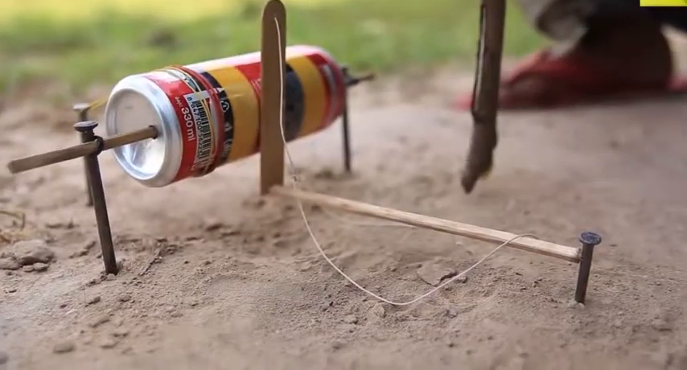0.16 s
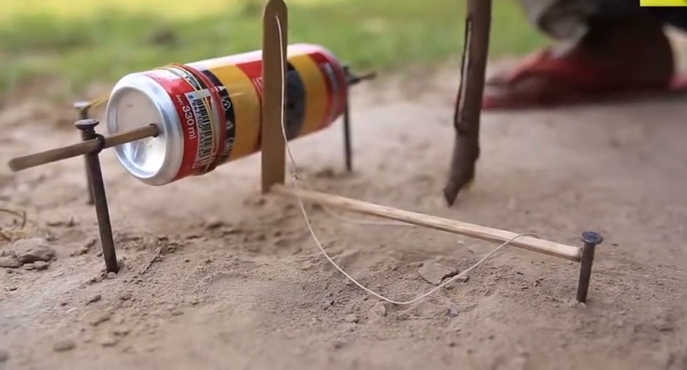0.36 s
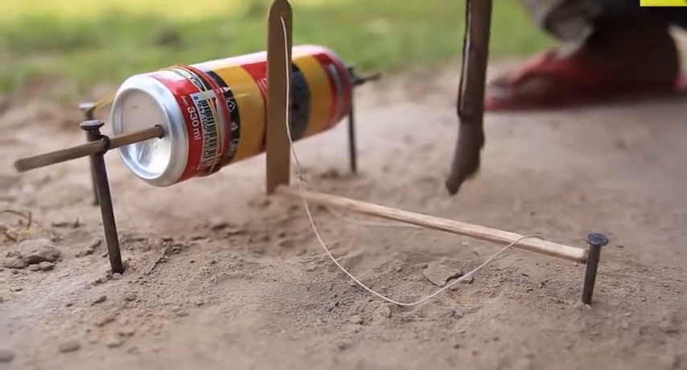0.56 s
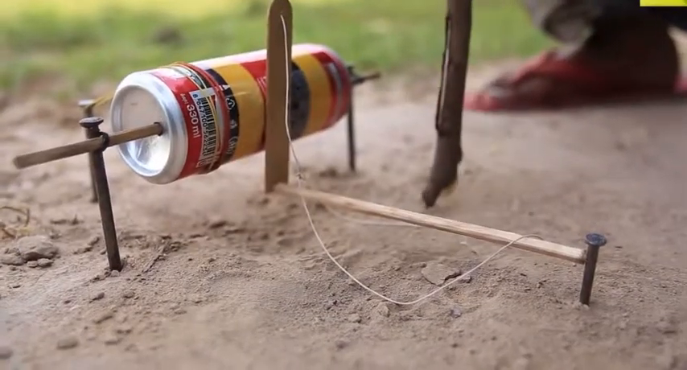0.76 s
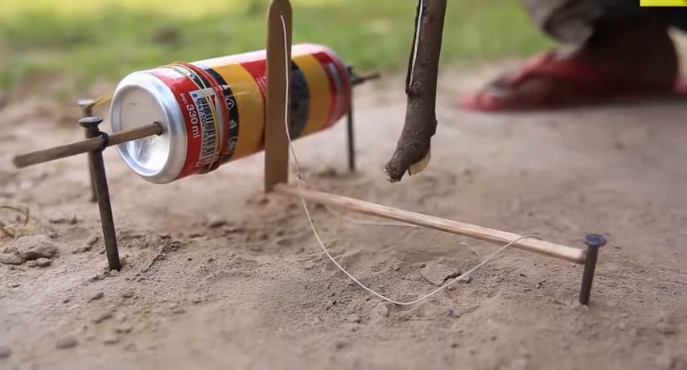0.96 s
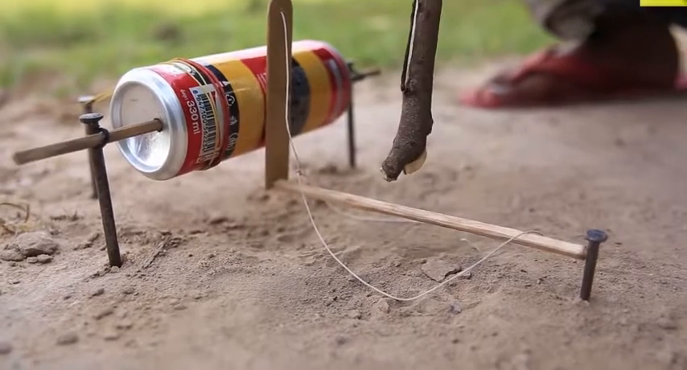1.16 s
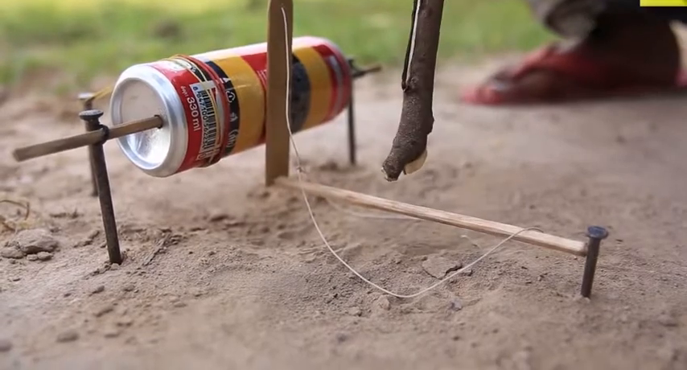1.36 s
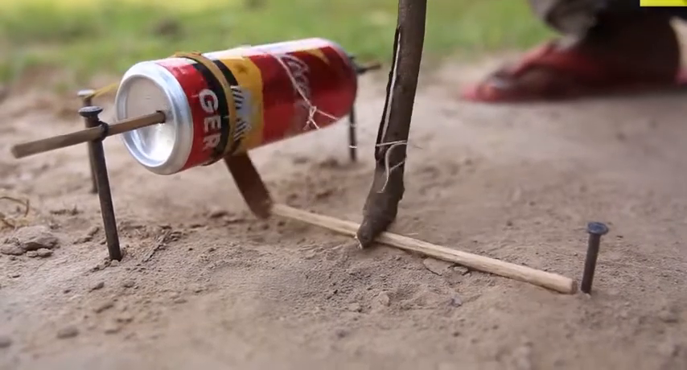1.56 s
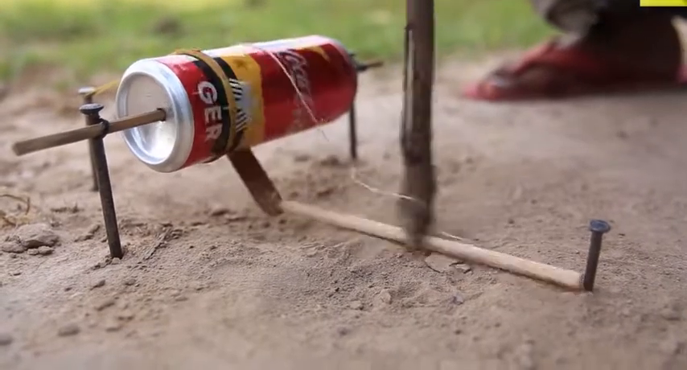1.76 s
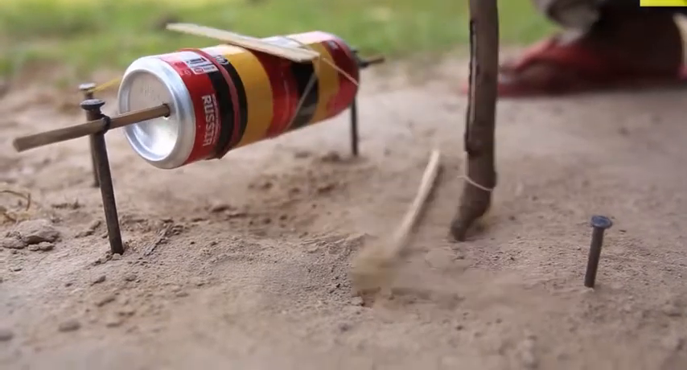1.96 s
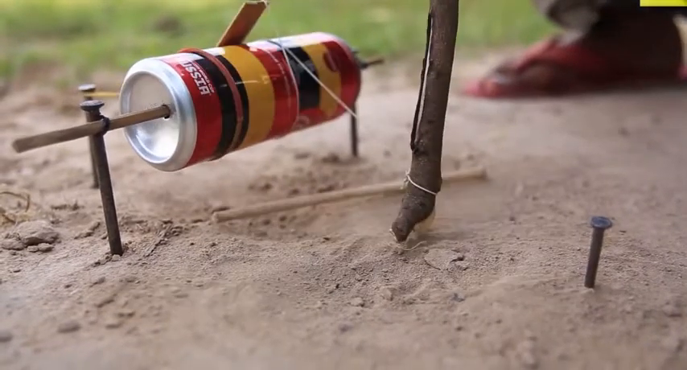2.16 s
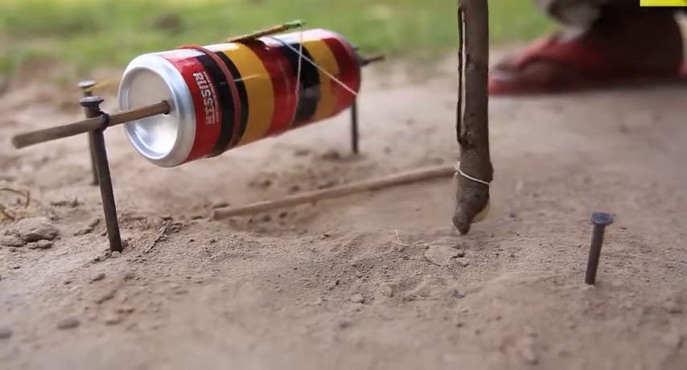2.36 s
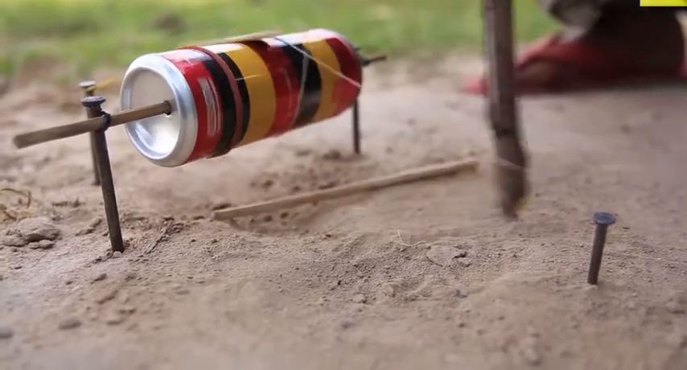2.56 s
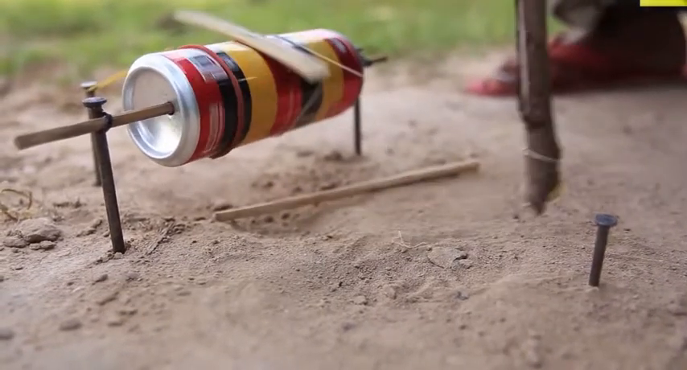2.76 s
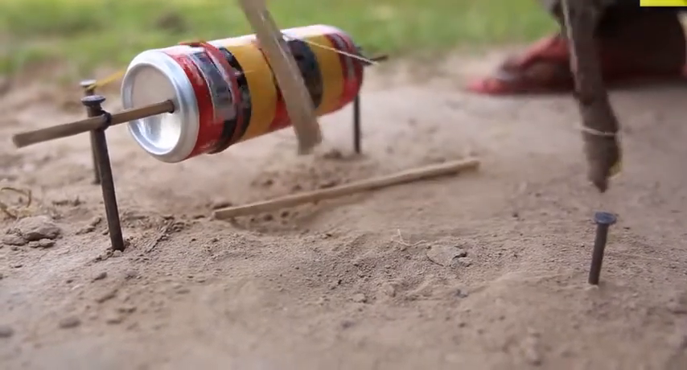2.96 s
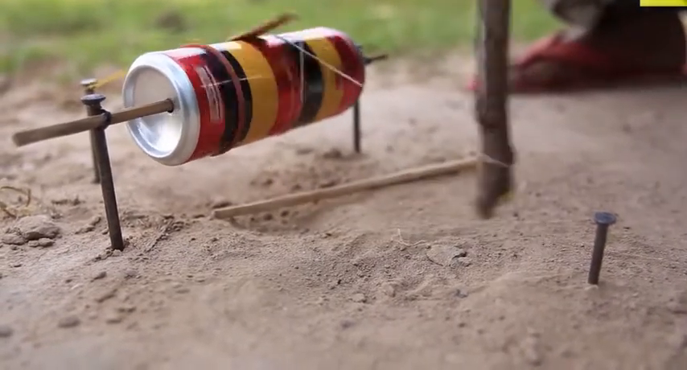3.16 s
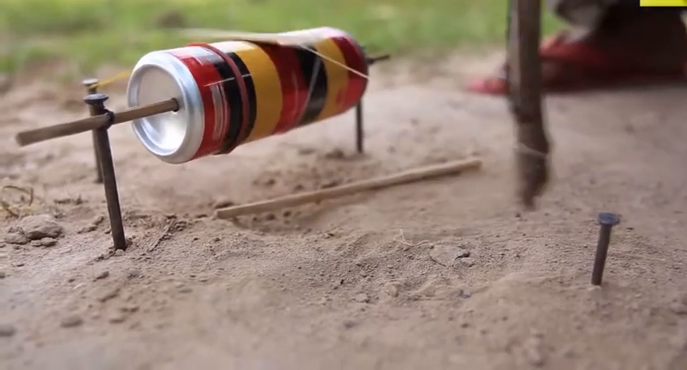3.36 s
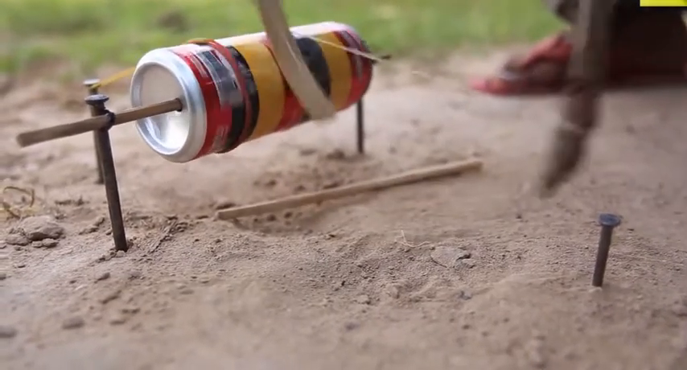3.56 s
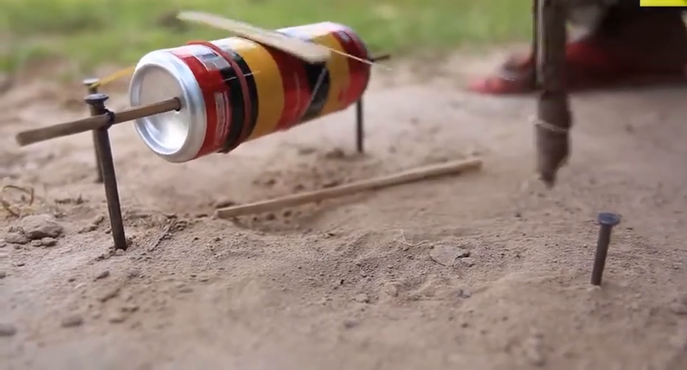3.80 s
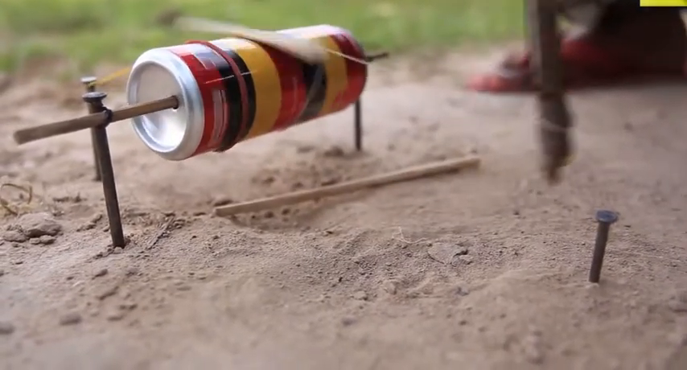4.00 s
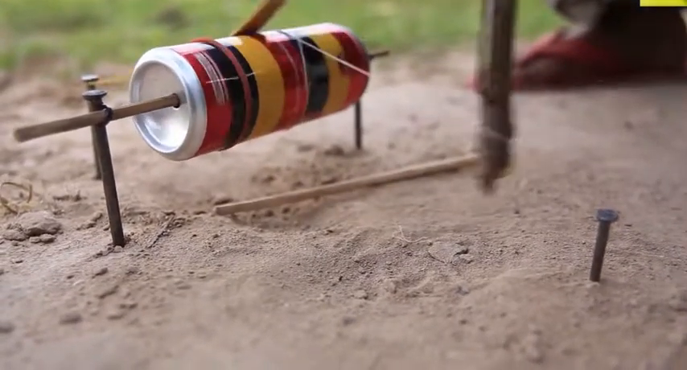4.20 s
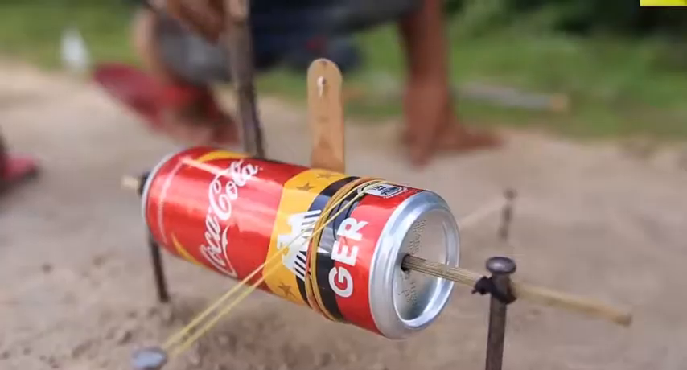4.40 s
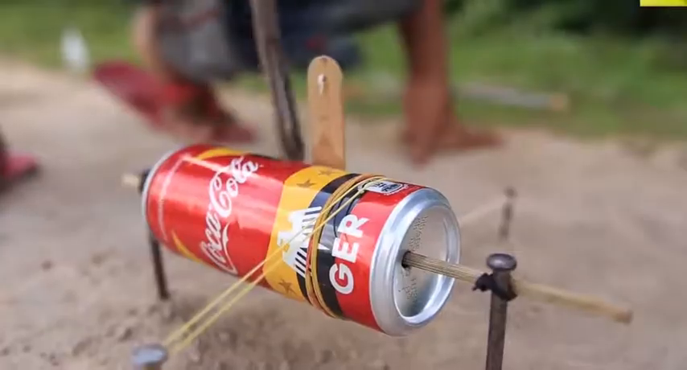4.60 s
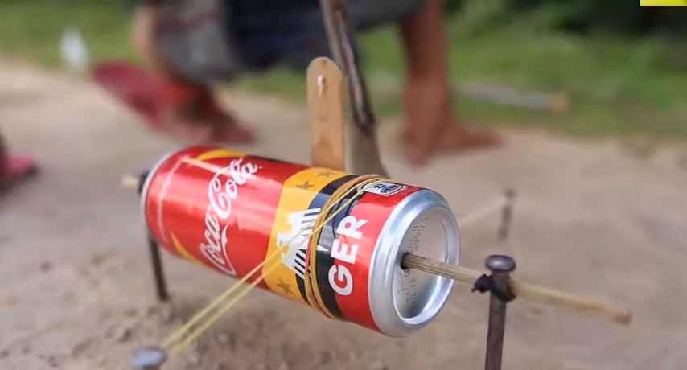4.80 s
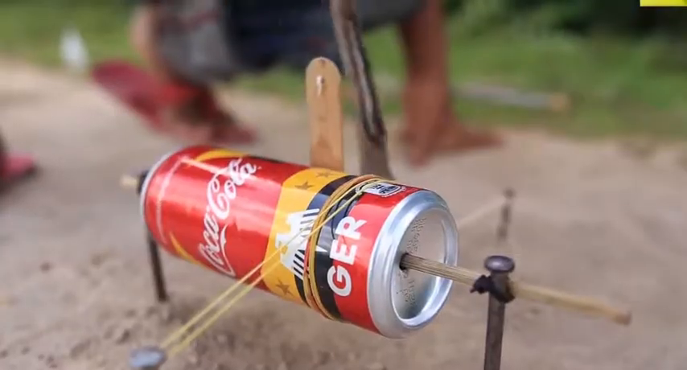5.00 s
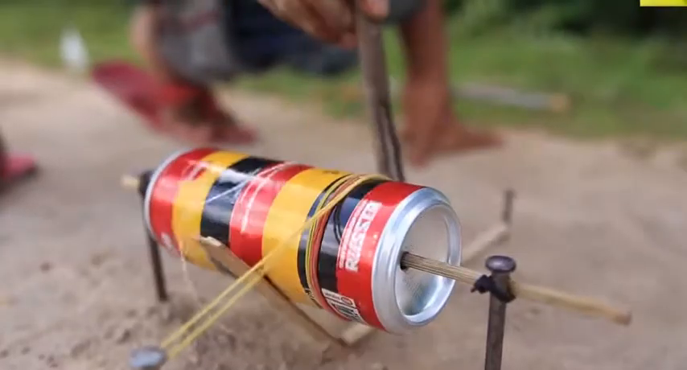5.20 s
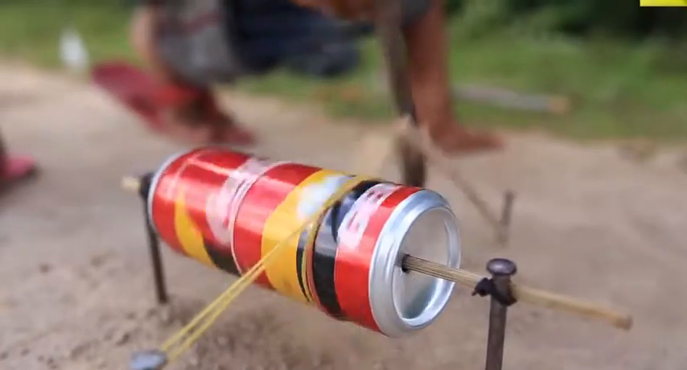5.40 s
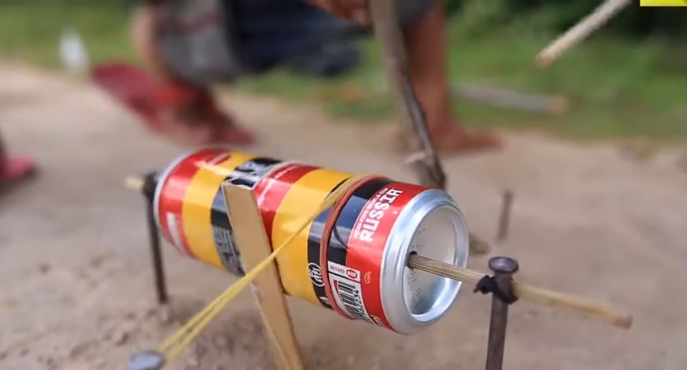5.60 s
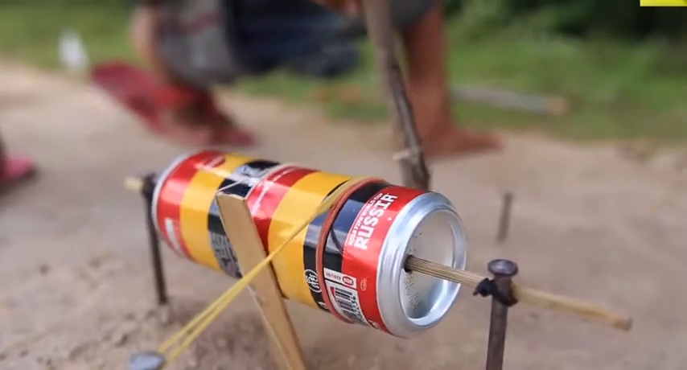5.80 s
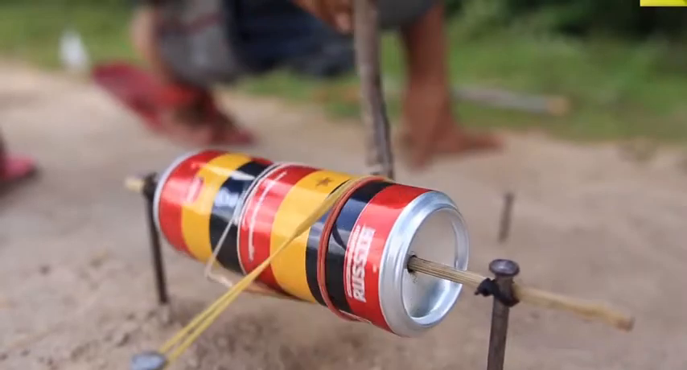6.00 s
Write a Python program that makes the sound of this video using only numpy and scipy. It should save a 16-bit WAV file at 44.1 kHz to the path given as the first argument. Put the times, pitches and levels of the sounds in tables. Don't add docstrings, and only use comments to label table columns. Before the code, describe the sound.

An empty aluminium can on a wooden axle, outdoors on sandy ground, nearly dry with only slight open-air scatter. First comes quiet, then a hard overloading slap and woody clatter, then uneven tinny rattles and flaps as the string is pulled. The microphone position moves close; after a pause the lever cracks onto the can again, followed by tight, damped chatter held by the string.

```python
import sys
import numpy as np
from scipy import signal
from scipy.fft import rfft, irfft, next_fast_len
from scipy.io import wavfile

SR = 44100
rng = np.random.default_rng(int(sys.argv[2]) if len(sys.argv) > 2 else 0)


def undo_db(level):
    steps = np.asarray(level, float) / 20
    return 10 ** steps


def generate_wav(sig):
    pcm = np.round(np.clip(np.atleast_2d(sig).T, -1, 1) * 32767).astype(np.int16)
    wavfile.write(sys.argv[1], SR, pcm)


N = 266805

# (time [s], peak level [dB], pitch of the struck spot [Hz], chatter T60 [s])
LEVER_SLAMS = [
    (1.5821, 14.8, 879, .022),
    (1.5905, 12, 1700, .02),
]
FAR_CRACKS = [
    (1.554, -12.5, 890, 0.042),
    (1.575, -21, 1000, 0.093),
    (1.8591, -32, 1800, .1),
    (1.8735, -23.5, 1420, 0.045),
    (1.9708, -6, 1430, 0.027),
    (2.0319, -19.5, 2170, 0.024),
    (2.1508, -33.5, 420, 0.04),
    (2.1704, -36, 465, 0.051),
]
FAR_THUDS = [(1.507, -20, 600, 0.18), (1.5189, -12.5, 1810, 0.051), (1.5396, -12, 450, 0.051),
             (1.5637, -4.5, 980, 0.067), (1.6109, -25, 657, 0.013), (1.6299, -12, 248, 0.087),
             (1.845, -29.5, 1490, 0.074), (1.8419, -23.5, 297, 0.083), (1.8982, -31, 409, 0.079),
             (1.9312, -15, 760, 0.067), (1.9593, -21, 970, 0.034), (1.9838, -6.5, 940, 0.066),
             (1.9919, -17.5, 770, 0.16), (2.059, -26, 650, 0.044), (2.191, -32, 933, .024),
             (2.3119, -37, 732, 0.028), (2.3554, -42, 872, 0.052)]
SWING_JOLTS = [
    (1.9123, -21, 930, 0.05),
    (2.0155, -13, 2110, 0.033),
    (2.1305, -28.5, 1430, 0.027),
]
TUG_JOLTS = [(2.5986, -36, 720, 0.1), (2.6926, -27.5, 1100, 0.041), (2.801, -6, 1003, 0.019),
             (2.8326, -23, 700, 0.023), (3.1189, -17.5, 950, 0.067), (3.1452, -11, 990, 0.025),
             (3.2084, -21.5, 704, 0.052), (3.2514, -11, 2127, 0.036), (3.4427, -17, 624, .06),
             (3.4708, -24, 374, 0.033), (3.4888, -13.5, 2127, .07), (3.5892, -20, 850, 0.015),
             (3.6585, -24, 670, 0.027), (3.6734, -20.5, 675, .043), (4.0087, -10.5, 2127, .039),
             (4.0513, -18, 865, 0.028), (4.1068, -13, 900, 0.042), (4.1798, -18.5, 840, 0.032),
             (4.2246, -12, 930, 0.037), (4.2798, -23, 535, 0.024)]
TUG_FLAPS = [(2.5344, -26, 910, 0.054), (2.6345, -21, 1010, 0.19), (2.6592, -22.5, 700, 0.12),
             (2.7456, -29, 550, 0.19), (2.769, -23, 2060, 0.058), (2.812, -17, 930, 0.024),
             (2.8527, -22.5, 765, 0.072), (2.9896, -31, 710, .043), (3.0267, -36, 678, .15),
             (3.0871, -28, 474, 0.052), (3.1113, -18.5, 2250, .037), (3.1557, -13.5, 760, 0.015),
             (3.2301, -22, 630, 0.15), (3.267, -19.5, 940, 0.051), (3.3386, -28.5, 657, 0.24),
             (3.3743, -22, 960, 0.076), (3.4125, -5.5, 1570, 0.023), (3.4568, -17, 720, 0.066),
             (3.547, -25.5, 455, 0.2), (3.5796, -23, 910, 0.11), (3.6261, -9.5, 897, 0.024),
             (3.6844, -22, 725, 0.076), (3.8117, -23.5, 940, 0.037), (3.8621, -22.5, 720, .032),
             (3.9556, -34, 520, 0.034), (3.98, -18.5, 700, 0.072), (4.0647, -19, 566, 0.066),
             (4.0947, -26, 388, .053), (4.1873, -12, 960, 0.0087), (4.1961, -17, 2100, 0.054)]
NEAR_SNAPS = [
    (5.172, -21, 900, 0.13),
    (5.1833, -1.5, 2020, 0.057),
    (5.2004, -2, 2000, 0.048),
    (5.2236, 12, 1744, 0.051),
    (5.2617, 2.5, 1880, 0.054),
    (5.272, -6, 1890, 0.025),
]
HELD_CRACKS = [
    (5.433, -30.5, 1500, .19),
    (5.45, -14, 2670, 0.028),
    (5.4994, -2.5, 1860, 0.082),
    (5.59, -4, 1870, 0.11),
    (5.5972, 8.5, 1968, 0.022),
    (5.634, -5, 2690, 0.057),
    (5.897, -22.5, 1020, .017),
    (5.9453, -14.5, 1400, 0.036),
    (6.0103, -18.5, 1200, 0.03),
    (6.046, -8.5, 2700, 0.016),
]
HELD_THUDS = [(5.4614, -12.5, 1970, .054), (5.546, -8.5, 2600, 0.063), (5.5598, -7.5, 2500, 0.026),
              (5.5712, -13.5, 1090, .04), (5.602, -2, 1110, 0.058), (5.612, -13, 1110, 0.018),
              (5.649, -3.5, 1090, 0.019), (5.7487, -38, 355, 0.032), (5.7923, -21.5, 1140, 0.011),
              (5.8266, -20.5, 1200, 0.026), (5.851, -21, 1130, 0.034), (5.8903, -18, 1180, 0.052),
              (5.907, -10.5, 1110, .038), (6.017, -21, 1120, 0.014), (6.0287, -16.5, 2230, 0.045),
              (6.0378, -12, 2620, 0.018)]
GRIT_TICKS = [
    (0.323, -46, 1500, 0.02),
    (.7025, -36, 305, 0.014),
    (4.4564, -36.5, 2700, 0.016),
]

# (treble under the body [dB], ring [dB])
SLAM_TONE = (-10, -13.5)
FAR_CRACK_TONE = (-10, -3)
FAR_THUD_TONE = (-23, -21.5)
SWING_TONE = (-15.5, 1.7)
JOLT_TONE = (-24, 0.44)
FLAP_TONE = (-23, -13.5)
NEAR_TONE = (-6.5, -5)
HELD_CRACK_TONE = (-4, -6)
HELD_THUD_TONE = (-13, -15)
GRIT_TONE = (0, -20)

# (frequency [Hz], level [dB], T60 [s])
SNAP_CAN = [(250, -8, .08), (585, -5, .14), (690, -2, .24), (1110, -3, .12), (1420, -8, .07),
            (1740, -9, .1), (2125, 3, .12), (2270, -15, .2), (2500, -20, .2)]
FAR_CAN = [(119, -8, 0.12), (400, -11, 0.47), (700, -8, 0.36), (970, -11, 0.12), (1710, 13.5, 0.015),
           (2127, 3.5, 0.077), (3860, -19, 0.046), (5620, -28, 0.04), (6020, -46.5, 0.054)]
NEAR_CAN = [(330, -14, .1), (731, -1, .23), (867, -2, .19), (1045, -9, .16), (1432, -18, .14),
            (1670, 0, .08), (1790, 0, .1), (1910, -8, .12), (2480, -22, .14), (2805, -16, .15)]
HELD_CAN = [(300, -8, .07), (700, -10, .06), (1100, 0, .07), (1400, -5, .09), (1860, 0, .07),
            (2100, -8, .07), (2680, -2, .08), (4700, -18, .04)]

# (frequency [Hz], level [dB])
SNAP_BODY = [(120, -21.5), (250, -4.5), (500, 1), (950, 4), (1500, 7.5), (2100, 3.5), (2600, -20),
             (3200, -21.5)]
FAR_BODY = [(120, 19), (250, -23), (400, 3), (950, 12), (1350, 0.5), (2150, 9.5), (2550, -104), (3200, -41)]
NEAR_BODY = [(150, -48), (300, -11), (700, -13.5), (1100, 0.5), (1350, -10.5), (1850, 1), (2750, 2),
             (3150, -64)]

# (frequency [Hz], level [dB])
SNAP_TREBLE = [(1500, -51), (2800, -11.5), (4500, 6.5), (6000, -2.5), (8000, -5.5), (11000, -19.5),
               (16000, -23.5)]
FAR_TREBLE = [(1500, -11), (2800, -23.5), (4400, 8), (5100, -18), (5750, 9.5), (6400, -16), (9000, -36),
              (16000, -62)]
NEAR_TREBLE = [(1760, 5.5), (3000, -12.5), (3400, -20), (4700, -0.5), (10300, -12.5), (13200, -25.5),
               (14800, -47), (16000, -27)]

# (time [s], level [dB])
SWING_RUB = [(1.5, -67), (2.06, -56), (2.25, -63.5)]
TUG_RUB = [(2.5, -56), (2.72, -48), (2.95, -63), (3.18, -47), (3.3, -51.5), (3.55, -50), (3.72, -54),
           (3.78, -54), (3.94, -55), (4.0, -41.5), (4.15, -40.5), (4.3, -43)]
HELD_RUB = [(5.419, -47), (5.46, -48.5), (5.58, -31.5), (5.66, -42), (5.72, -63.5), (6.05, -48)]

# (time [s], level [dB], frequency [Hz], T60 [s])
THUMPS = [
    (1.584, -3, 130.5, .018),
    (1.63, -26, 255, 0.084),
    (1.842, -29.5, 290, 0.041),
    (3.413, -36, 100.6, 0.034),
    (4.455, -36.5, 200, .04),
    (5.225, -15, 96, 0.036),
    (5.27, -20, 320, 0.078),
    (5.6, -20, 90, .03),
    (5.452, -30, 329, 0.21),
]
# (frequency [Hz], T60 [s])
YARD = [(300, 0.21), (1500, 0.22), (5000, 0.12), (9000, 0.046)]
# (time [s], level [dB], frequency [Hz], length [s])
CHIRPS = [
    (4.684, -29.5, 2730, 0.0051),
]
# (frequency [Hz], spectrum level [dB per Hz])
AIR = [(12, -34), (20, -5), (86, -7), (367, -8.5), (472, -9), (759, -11.5), (976, -12), (1060, -14.5),
       (1370, -15), (14300, -24.5), (16000, -25)]

AIR_DB, HISS_DB, YARD_DB = -54.5, -61, -25
FAR_CUT_HZ, NEAR_CUT_HZ, HELD_CUT_HZ = 130, 200, 325
WALL_CUT_HZ = 358
CUT_S = 4.287
HARDER_IS_BRIGHTER = 0.18


def trap(kinds, rubbing, can, body, treble, cut_hz):
    out = np.zeros(N)
    can_rings = modes(*np.transpose(can), size=9000)
    if rubbing:
        add(out, *rub(rubbing, can_rings, body, treble))
    for rows, contact in kinds:
        for row in rows:
            add(out, *knock(row, contact, can, can_rings, body, treble))
    high_pass = signal.butter(2, cut_hz, "high", fs=SR, output="sos")
    return yard(signal.sosfilt(high_pass, out))


def knock(row, contact, can, can_rings, body, treble):
    s, peak_db, spot_hz, t60 = row
    treble_db, ring_db = contact
    drive = chatter(t60, per_s=1400, spread_db=4.16)
    wall = struck_wall(spot_hz, body)
    ring = struck_can(spot_hz, can, can_rings)
    sound = undo_db(ring_db - 6.5) * peaked(ring)
    sound[:len(wall)] += peaked(wall)
    sound = peaked(signal.oaconvolve(sound, drive))
    crack = contact_crack(drive, treble)
    treble_db = treble_db + 6.0 + HARDER_IS_BRIGHTER * min(peak_db, 0)
    sound[:len(crack)] += undo_db(treble_db) * peaked(crack)
    return s, undo_db(peak_db) * sound


def chatter(t60, per_s, spread_db):
    size = 3500
    t = np.arange(size) / SR
    bounces = (rng.random(size) < per_s / SR) * rng.choice([-1., 1.], size)
    bounces *= undo_db(spread_db * rng.standard_normal(size) - 60 * t / np.clip(t60, .004, .2))
    bounces *= 1 - np.exp(-t / 0.0035)
    bounces[0] = 0.45
    return bounces


def struck_wall(spot_hz, body):
    hz = np.append(spot_hz, 200 * 16.37 ** rng.random(36))
    near_db = 10 * np.exp(-(np.log(hz / spot_hz) / .3) ** 2)
    t60 = .03 * (1000 / hz) ** .15
    wall = modes(hz, read(body, hz) + near_db, t60, size=1800).sum(1)
    return signal.lfilter(*signal.butter(2, WALL_CUT_HZ, "high", fs=SR), wall)


def struck_can(spot_hz, can, can_rings):
    struck_db = 3 * rng.standard_normal(len(can))
    struck_db += 6 * np.exp(-(np.log(np.transpose(can)[0] / spot_hz) / 0.075) ** 2)
    return can_rings @ undo_db(struck_db)


def contact_crack(drive, treble):
    tick = rng.standard_normal(1500) * undo_db(-60 * np.arange(1500) / SR / 0.0028)
    first = drive * undo_db(-300 * np.arange(len(drive)) / SR)
    burst = np.roll(signal.oaconvolve(tick, first), 60)
    return coloured(burst, treble)[60:4000]


def rub(rows, can_rings, body, treble):
    s, level_db = np.transpose(rows)
    t = np.arange(s[0], s[-1], 1 / SR)
    slips = (rng.random(len(t)) < 4000 / SR) * rng.standard_normal(len(t))
    slips *= undo_db(3.9 * np.minimum(rng.exponential(1, len(t)), 3.5))
    ring = signal.oaconvolve(slips, can_rings.sum(1))[:len(t)]
    sound = evened(coloured(slips, body))
    sound += undo_db(-11) * evened(ring)
    sound += undo_db(-23.0) * evened(coloured(slips, treble))
    return s[0], undo_db(np.interp(t, s, level_db)) * evened(sound)


def thump(s, db, hz, t60):
    return s, modes(hz, db, t60, size=3000)[:, 0]


def yard(x):
    hz, t, z = signal.stft(rng.standard_normal(SR // 2), SR, nperseg=256)
    decay = undo_db(-60 * t / read(YARD, hz)[:, None])
    tail = signal.istft(z * decay, SR, nperseg=256)[1]
    return x + undo_db(YARD_DB) * signal.fftconvolve(x, tail / np.linalg.norm(tail))[:N]


def bird(s, db, hz, length):
    t = np.arange(0, length, 1 / SR)
    return s, undo_db(db) * np.sin(np.pi * t / length) ** 2 * np.sin(2 * np.pi * hz * t)


def quiet_air():
    return undo_db(AIR_DB) * evened(coloured(rng.standard_normal(N), AIR))


def amplifier_hiss():
    return undo_db(HISS_DB) * rng.standard_normal(N)


def modes(hz, db, t60, size):
    t = np.arange(size)[:, None] / SR
    return undo_db(db - 60 * t / t60) * np.sin(2 * np.pi * hz * t)


def coloured(x, points):
    size = next_fast_len(len(x))
    gain = undo_db(read(points, np.fft.rfftfreq(size, 1 / SR)))
    return irfft(rfft(x, size) * gain, size)[:len(x)]


def read(points, hz):
    f, value = np.transpose(points)
    return np.interp(np.log(hz + 1), np.log(f + 1), value)


def evened(x):
    return x / np.sqrt(np.mean(x ** 2) + 1e-20)


def peaked(x):
    return x / np.abs(x).max()


def add(mix, s, sound):
    part = mix[round(s * SR):][:len(sound)]
    part += sound[:len(part)]


def scene():
    tripped = [(FAR_CRACKS, FAR_CRACK_TONE), (FAR_THUDS, FAR_THUD_TONE), (GRIT_TICKS, GRIT_TONE),
               (LEVER_SLAMS, SLAM_TONE), (SWING_JOLTS, SWING_TONE)]
    tugged = [(TUG_JOLTS, JOLT_TONE), (TUG_FLAPS, FLAP_TONE)]
    snapped = [(NEAR_SNAPS, NEAR_TONE)]
    held = [(HELD_CRACKS, HELD_CRACK_TONE), (HELD_THUDS, HELD_THUD_TONE)]

    mix = trap(tripped, SWING_RUB, SNAP_CAN, SNAP_BODY, SNAP_TREBLE, FAR_CUT_HZ)
    far = trap(tugged, TUG_RUB, FAR_CAN, FAR_BODY, FAR_TREBLE, FAR_CUT_HZ)
    mix += far * np.clip((CUT_S - np.arange(N) / SR) / 0.002, 0, 1)
    mix += trap(snapped, [], NEAR_CAN, NEAR_BODY, NEAR_TREBLE, NEAR_CUT_HZ)
    mix += trap(held, HELD_RUB, HELD_CAN, NEAR_BODY, NEAR_TREBLE, HELD_CUT_HZ)
    for row in THUMPS:
        add(mix, *thump(*row))
    for row in CHIRPS:
        add(mix, *bird(*row))
    mix += quiet_air()
    hiss = amplifier_hiss()
    return np.array([mix + hiss, mix - hiss])


def band_limit(x):
    return signal.sosfilt(signal.butter(12, 16440, fs=SR, output="sos"), x)


def record(dry):
    ceiling, edge_hz = .86, 15850
    overloaded = ceiling * dry / (ceiling ** 8 + dry ** 8) ** (1 / 8)
    low_pass = signal.firwin(255, edge_hz, fs=SR)
    limited = signal.oaconvolve(overloaded, low_pass[None], "same")
    return band_limit(limited)


dry = scene()
out = record(dry)
generate_wav(out)
```